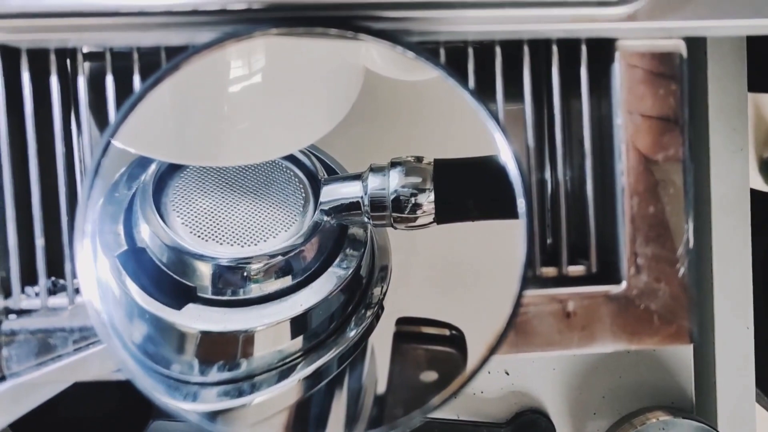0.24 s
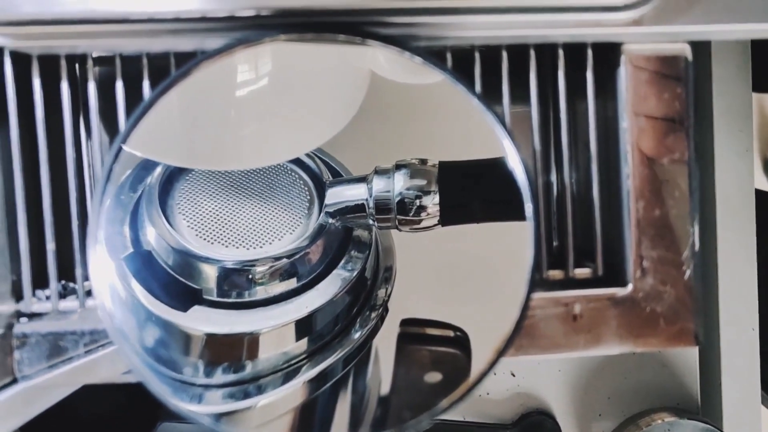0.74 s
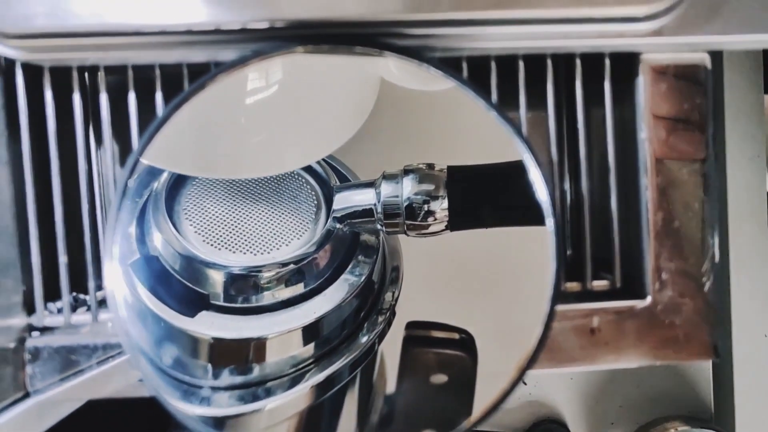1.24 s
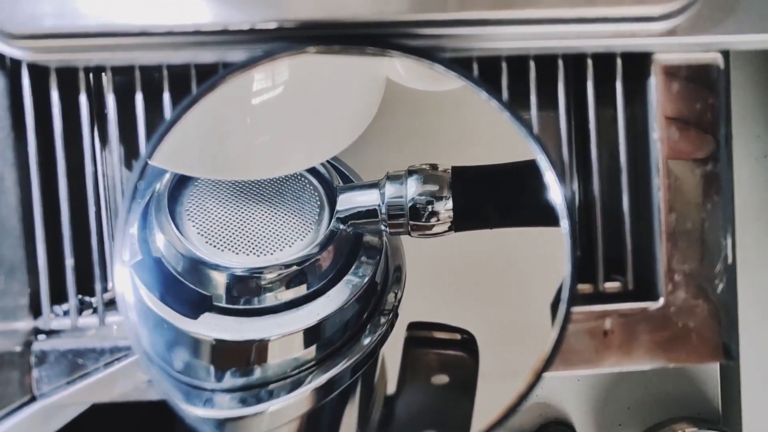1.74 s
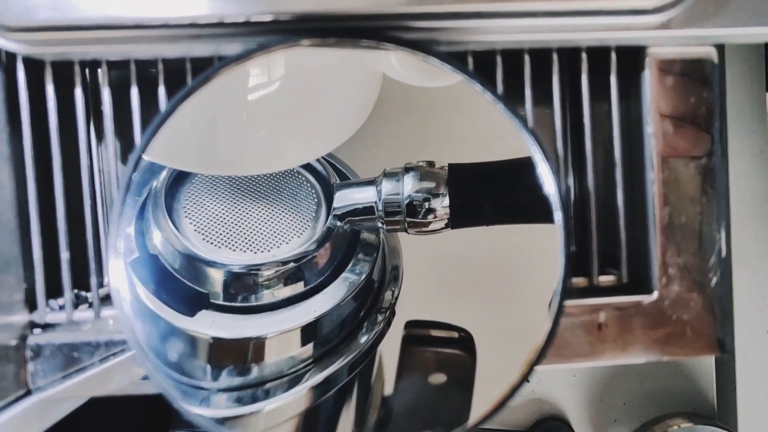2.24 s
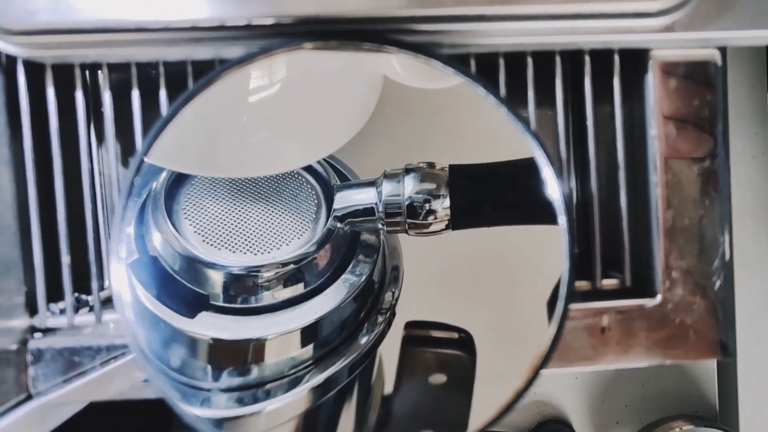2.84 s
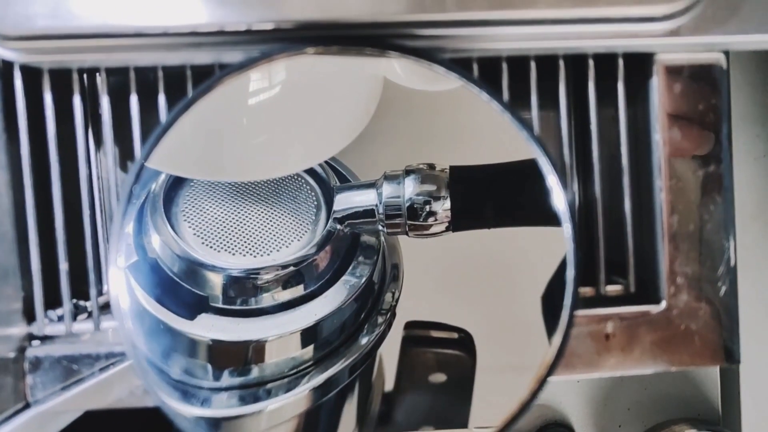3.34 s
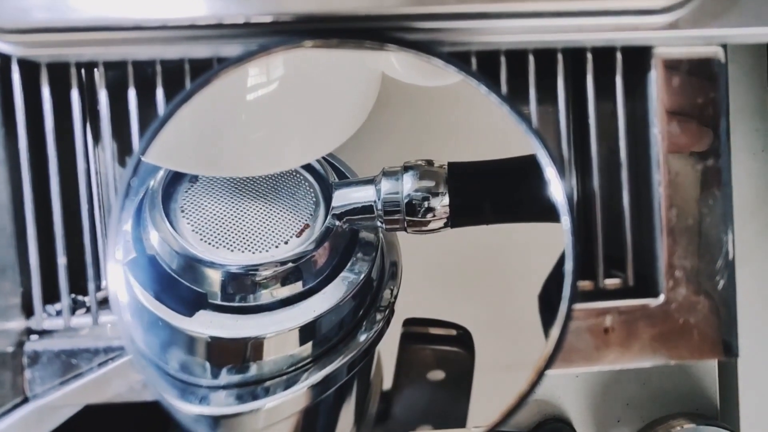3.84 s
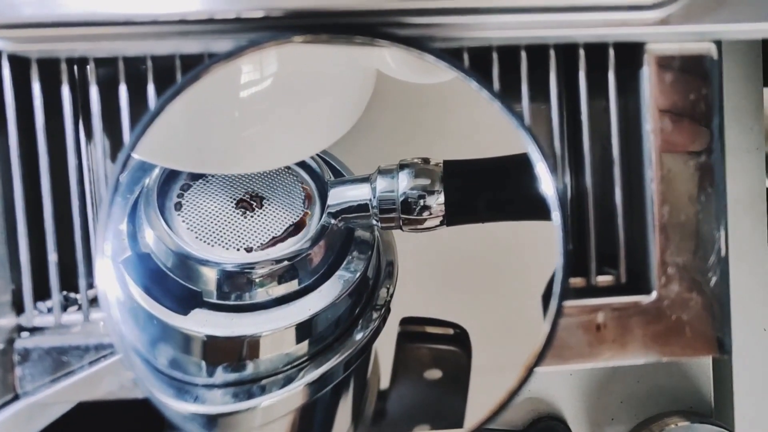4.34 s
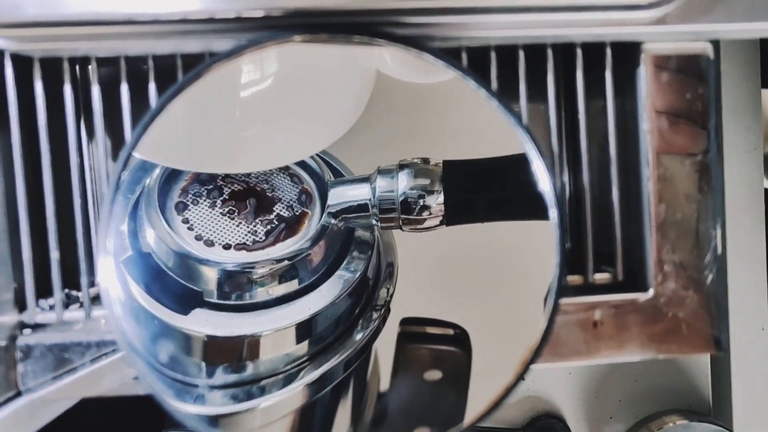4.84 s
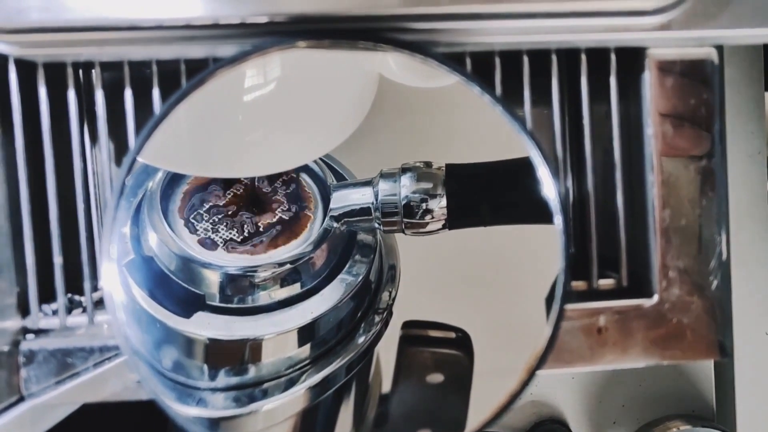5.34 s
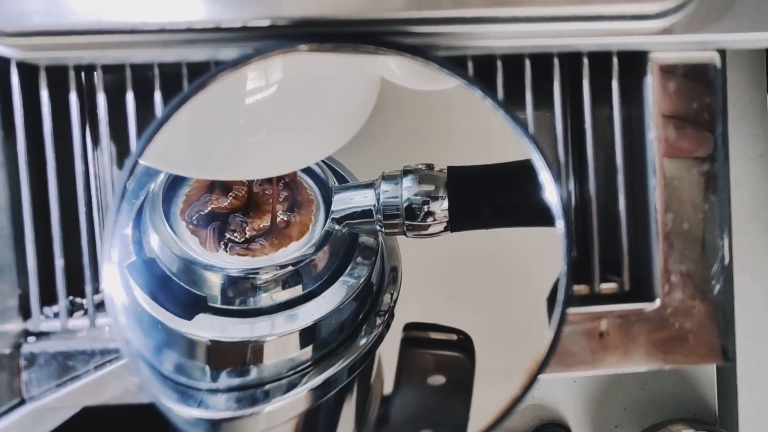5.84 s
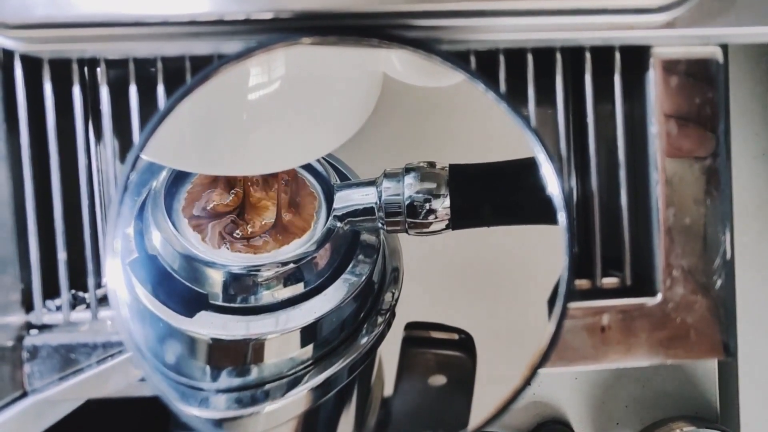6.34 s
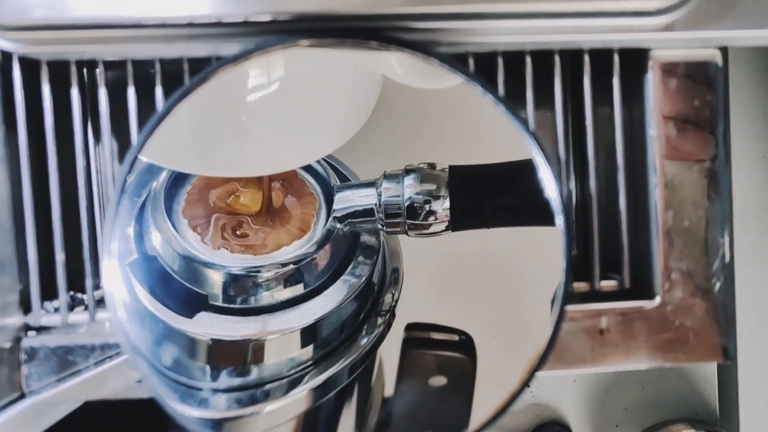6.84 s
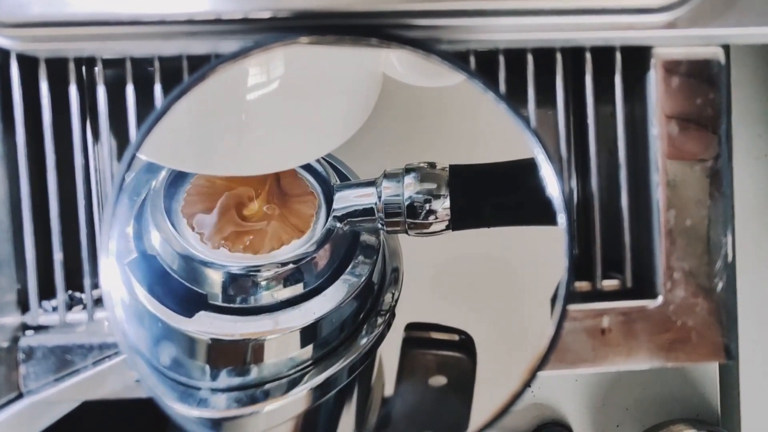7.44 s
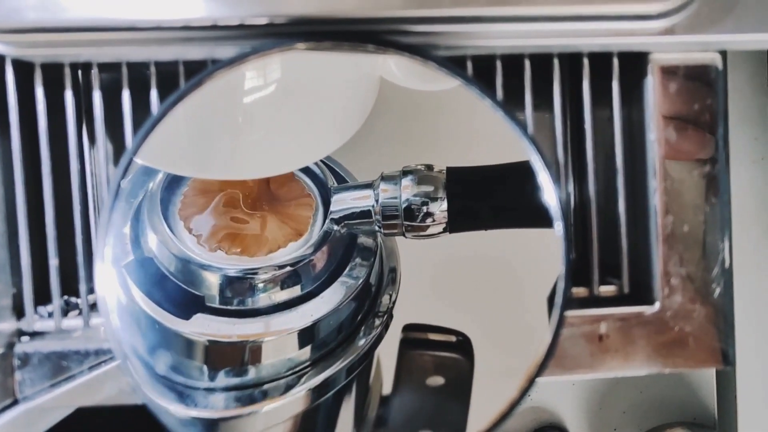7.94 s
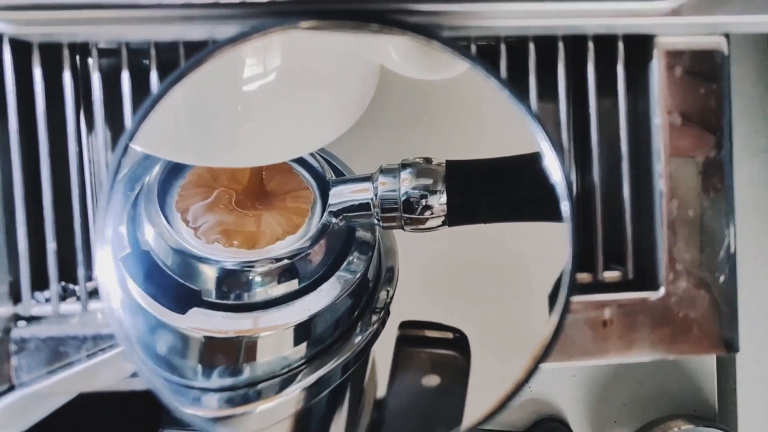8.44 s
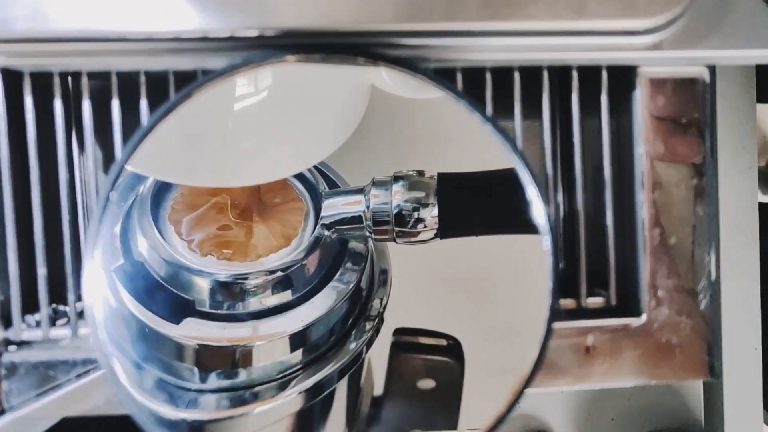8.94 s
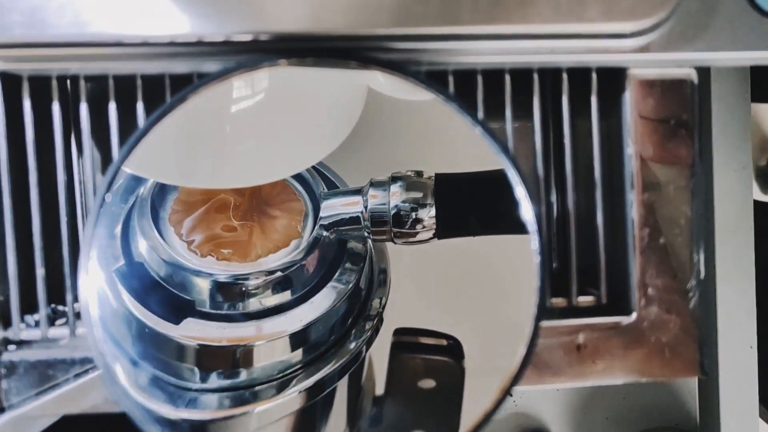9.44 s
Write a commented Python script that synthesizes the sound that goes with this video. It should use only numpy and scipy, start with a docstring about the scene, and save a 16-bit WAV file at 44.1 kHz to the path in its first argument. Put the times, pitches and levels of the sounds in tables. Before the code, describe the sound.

Close stereo sound of an espresso machine in a quiet kitchen. Faint room tone and a fuzzy distant drone come first, then a quick cluster of dull clunks and a small hiss as the pump motor starts. It holds a low mains-like hum with a fast rattling throb and rushing water. Several seconds later, bright coffee drops patter for about a second, ending with one deeper plop under the continuing hum.

```python
"""A quiet kitchen with a faint fuzzy drone; then the motor of a rotary espresso pump switches on and hums.
Mains buzz, shaft tones and their beats are sums of cosines; water and bearings rush as shaped noise with a
rattle that repeats with the rotations. Switch and valve blows ring the frame. Later the first coffee drops
spatter into a cup as bubble notes, ticks and spray. Two close microphone ports hear most tones at different
strengths; some weak tones reach both alike."""
import sys
import numpy as np
from scipy import signal
from scipy.fft import rfft, irfft, next_fast_len
from scipy.io import wavfile

SR = 44100
rng = np.random.default_rng(int(sys.argv[2]) if len(sys.argv) > 2 else 0)


def magnitude_from_level(level_db):
    """Linear magnitude for a level in decibels (20 dB per decade)."""
    exponent = np.asarray(level_db, float) / 20
    return 10 ** exponent


def generate_wav(sig):
    """Save sig (samples, or channels by samples) to the path in sys.argv[1] as 16-bit PCM at SR."""
    pcm = np.round(np.clip(np.atleast_2d(sig).T, -1, 1) * 32767).astype(np.int16)
    wavfile.write(sys.argv[1], SR, pcm)


N = 427329
T = np.arange(N) / SR
SIZE = next_fast_len(N)
HZ = np.fft.rfftfreq(SIZE, 1 / SR)


def read(points, hz):
    """Columns of a spectrum table at the frequencies hz, interpolated over log frequency."""
    f, *columns = np.transpose(points)
    return [np.interp(np.log(hz + 1), np.log(f + 1), c) for c in columns]


def add(mix, s, sound):
    """Mixes a two-channel sound in at time s."""
    part = mix[:, round(s * SR):][:, :sound.shape[1]]
    part += sound[:, :part.shape[1]]


def drift(t, top_hz):
    """Slow random wandering of rms 1: sines of random phase from 0.1 Hz to top_hz."""
    hz = np.geomspace(.1, top_hz, 12)[:, None]
    x = (np.sin(2 * np.pi * (hz * t + rng.random((12, 1)))) / hz ** 0.03).sum(0)
    return x / x.std()


def peak_shape(hz, width_hz):
    """Power response of a resonance on the grid HZ, 1 at its centre."""
    return 1 / (1 + (2 * (HZ - hz) / width_hz) ** 2)


def noise(left_db, right_db, same, source=None):
    """Steady two-channel noise from dB per Hz and left-right likeness on the grid HZ."""
    a, b = rfft(rng.standard_normal((2, N)) if source is None else source, SIZE)
    same = np.clip(same, -1, 1)
    z = np.array([a, same * a + np.sqrt(1 - same ** 2) * b]) * magnitude_from_level([left_db, right_db])
    return irfft(z, SIZE)[:, :N] * np.sqrt(SR / 2)


# Room tone. Each row: frequency in Hz, relative density in dB per Hz.
AIR = [(20, 0), (52, -2), (110, -20), (200, -22), (700, -26), (1400, -33), (5000, -46), (14500, -46)]
# Each row: frequency in Hz, left-right likeness of the room tone (0..1).
AIR_SAME = [(60, 0.37), (300, 0.35), (1200, 0.054), (3000, 0.12)]
AIR_DB = -65.5  # rms of the two-port mean
# Distant appliance. Each row: centre in Hz, width in Hz, approximate level in dB.
DRONE = [(345, 60, -83), (610, 50, -89), (1060, 90, -81)]


def kitchen():
    """Room tone as shaped noise, and a distant appliance's drone as narrow noise bands."""
    air = noise(*read(AIR, HZ) * 2, *read(AIR_SAME, HZ))
    air *= magnitude_from_level(AIR_DB) / air.mean(0).std()
    power_per_hz = sum(magnitude_from_level(db) ** 2 / width * peak_shape(hz, width) ** 2 for hz, width, db in DRONE)
    drone_db = 10 * np.log10(power_per_hz)
    return air + noise(drone_db, drone_db, 0.66)


# Hiss at the switch and as pressure arrives.
# Each row: start in seconds, length in seconds, approximate level in dB, centre in Hz, width in Hz.
SPITS = [(0.823, 0.043, -53, 7000, 9000), (1.11, 0.035, -45, 6900, 1200)]


def spits():
    """Short spits of hiss: resonant noise under a tapered window."""
    out = np.zeros((2, N))
    for s, length_s, db, hz, width in SPITS:
        shape_db = db - 10 * np.log10(width) + 10 * np.log10(peak_shape(hz, width))
        count = round(length_s * SR)
        add(out, s, noise(shape_db, shape_db - 2, 0)[:, :count] * signal.windows.tukey(count, .6))
    return out


SWITCH_S, PRESSURE_S = .83, 0.31  # motor on; time constant of the pressure rise


def since():
    """Seconds since the switch."""
    return np.maximum(T - SWITCH_S, 0)


def start(rise_s, slack_db):
    """Gain of a layer that rises after the switch; its slack offset vanishes as pressure builds."""
    return (1 - np.exp(-since() / rise_s)) ** 2 * magnitude_from_level(slack_db * np.exp(-since() / PRESSURE_S))


FREE_TURNS_PER_S, LOADED_TURNS_PER_S = 24.9, 23.6342  # without and with pressure
CREEP_TURNS_PER_S2 = .0018
SPIN_UP_S, BRAKE_S = .03, .11


def speed():
    """Shaft turns per second: it spins up, the water brakes it, then it creeps faster."""
    slip = (FREE_TURNS_PER_S - LOADED_TURNS_PER_S) * np.exp(-since() / BRAKE_S)
    braked = LOADED_TURNS_PER_S + CREEP_TURNS_PER_S2 * since() + slip
    return braked * (1 - np.exp(-since() / SPIN_UP_S))


BUZZ_HZ = 99.975  # twice the mains frequency
THROB = range(20, 23)  # shaft multiples that peak together once a turn
KNOCK_ANGLE_RAD, KNOCK_HZ = 3.32, (202, 530)  # half a turn later a duller knock aligns this band


def tones(rows, buzz, shaft, waver_db, in_step=False):
    """Sums wavering cosines at whole multiples of the two rotations.
    In step, neighbouring shaft multiples start together and throb once a turn.
    Buzz overtones are locked to the stroke: odd ones sharpen it, even ones skew it."""
    out, slow, last = np.zeros((2, len(buzz))), np.linspace(0, N / SR, 200), None
    for m, n, left_db, right_db, lead in rows:
        chance = 2 * np.pi * rng.random()
        begin = begin if in_step and last == (m, n - 1) else chance
        if n == 0 and in_step:
            stroke = 0 if m == 1 else (np.pi if m % 2 else -np.pi / 2)
            begin = stroke - lead / 2
        if m == 0 and in_step and n in THROB:
            begin = -.55 * abs(n - THROB[1])  # the outer two lag a little
        elif n != 0 and in_step and KNOCK_HZ[0] < m * BUZZ_HZ + n * LOADED_TURNS_PER_S < KNOCK_HZ[1]:
            begin = KNOCK_ANGLE_RAD * n - m + .3 * (chance - np.pi)  # loosely aligned
        if not (m == 0 and n in THROB[1:]):  # the throbbing tones swell together
            waver = np.interp(np.linspace(0, 199, len(buzz)), range(200), magnitude_from_level(waver_db * drift(slow, 3)))
        turn, last = m * buzz + n * shaft + begin, (m, n)
        rms = magnitude_from_level([[left_db], [right_db]])
        out += np.sqrt(2) * rms * waver * np.cos([turn + lead, turn])
    return out


# Other weak tones. Each row: frequency in Hz, base level in dB before the offsets and random spread.
FAINT = [(50, -68), (160, -65), (320, -66), (450, -72), (800, -63.5), (1400, -77.5), (2200, -77),
         (3200, -82)]


def faint_rows():
    """Rows for the other shaft multiples below 110 and some near beats of the buzz, of random strength."""
    typed = {(0, r[0]) for r in SHAFT} | {(r[0], r[1]) for r in [*BEATS, *WEAVE]}
    pairs = [(0, n) for n in range(2, 110)]
    pairs += [(m, n) for m in range(1, 18) for n in (-4, -2, 2, 4, 18)]
    m, n = np.transpose([p for p in pairs if p not in typed and p != (1, -4)])
    hz = m * BUZZ_HZ + n * LOADED_TURNS_PER_S
    spread = rng.uniform(-np.sqrt(3), np.sqrt(3), (len(m), 4)).T
    vane_db = 3 * (n % 4 == 0) * (m == 0)  # four vanes stress every fourth multiple
    apart = np.minimum(hz / 600, 2)  # the ports hear low tones alike
    common_db = read(FAINT, hz)[0] + vane_db - 2.5 * (m > 0) + 2 * spread[0]
    ports_db = common_db + 1.5 * apart * spread[1:3]
    return np.transpose([m, n, *ports_db, apart ** 2 * spread[3]])


# Mains buzz. Each row: multiple of the buzz, left rms in dB, right rms in dB, left lead in rad.
BUZZ = [(1, -24, -25.5, -0.1), (2, -40, -41, -0.1), (3, -48, -52, -0.0), (4, -57, -54, 0.0),
        (5, -43, -49, 0.8), (6, -51, -46, 2.2), (7, -51, -56, 1.0), (8, -51, -70, 0.4), (9, -62, -49, -1.6),
        (10, -66, -45, -1.1), (11, -55, -59, 0.6), (13, -72, -59, 2.4), (15, -55, -61, 1.2)]
# Shaft tones. Each row: multiple of the shaft speed, left rms in dB, right rms in dB, left lead in rad.
SHAFT = [(4,-55,-62,.4),(5,-50,-52,-.1),(6,-44,-44,0),(8,-50,-50,.2),(9,-56,-56,0),(12,-49,-54,-.8),(14,-55,-56,.3),(18,-57,-56,.1),(20,-44,-44,-.4),(21,-48,-46,0),(22,-46,-44,0),(24,-58,-51,2.4),(25,-59,-61,.8),(26,-51,-58,.7),(33,-63,-54,-.8),(34,-75,-55,-2.8),(39,-57,-54,-.4),(45,-60,-55,3.1),(46,-60,-53,1.7)]
# The magnetic pull beats with the turning rotor.
# Each row: buzz multiple, shaft multiple, left rms in dB, right rms in dB, left lead in rad.
BEATS = [(1, 1, -54, -62, -0.5), (3, -4, -56, -55, 0.0), (2, 2, -58, -59, -0.1), (-1, 18, -56, -55, 0.1),
         (1, 11, -57, -55, 0.0), (-1, 20, -57, -56, -0.0), (1, 26, -62, -55, 1.1), (7, 2, -57, -62, 1.9),
         (5, 2, -63, -59, 1.0), (3, 26, -52, -48, 0.9), (14, 2, -61, -80, 0), (15, -2, -59, -74, -0.9)]
# Weak tones alike at both ports; close neighbours weave.
# Each row: buzz multiple, shaft multiple, rms in dB.
WEAVE = [(0, 2, -58), (-1, 10, -57), (1, 2, -60), (-1, 14, -62), (1, 6, -63), (0, 11, -59), (2, 3, -64),
         (3, -1, -60), (1, 8, -61), (-2, 22, -61), (0, 15, -59), (3, 8, -62), (1, 18, -59), (0, 13, -60),
         (4, 4, -59), (0, 132, -73)]
BUZZ_ANGLE_RAD, SHAFT_ANGLE_RAD = -3, -1.262  # where the rotations stand at their zero
BUZZ_RISE_S, TURN_RISE_S = 0.027, 0.042
SLACK_BUZZ_DB, SLACK_OVERTONE_DB, SLACK_SHAFT_DB = -4, -4.5, -7  # offsets before pressure
HIGH_OVERTONE_S = 0.84  # the upper buzz overtones emerge late
START_WINDING_S, START_WINDING_DB = 0.944, -10  # buzz is weaker until the starting switch drops out


def motor(shaft):
    """Buzz, shaft tones and beats, computed at a quarter of the rate since all lie low."""
    t, shaft = T[::4], shaft[::4] + SHAFT_ANGLE_RAD
    buzz = 2 * np.pi * BUZZ_HZ * t + BUZZ_ANGLE_RAD
    rows = [(m, 0, *r) for m, *r in BUZZ]

    starting = magnitude_from_level(START_WINDING_DB * np.clip((START_WINDING_S - t) / 0.042 + 1, 0, 1))
    hum = tones(rows[:1], buzz, shaft, waver_db=0.0, in_step=True) * starting
    hum *= start(BUZZ_RISE_S, SLACK_BUZZ_DB)[::4]

    overtones = tones(rows[1:6], buzz, shaft, waver_db=0.86, in_step=True)
    overtones *= start(BUZZ_RISE_S, SLACK_OVERTONE_DB)[::4]

    high_overtones = tones(rows[6:], buzz, shaft, waver_db=1.8, in_step=True)
    high_overtones *= 1 - np.exp(-(since()[::4] / HIGH_OVERTONE_S) ** 2)

    turning_rows = [(0, *r) for r in SHAFT] + list(BEATS) + [(*r, r[2], 0) for r in WEAVE]
    turning = tones(turning_rows, buzz, shaft, waver_db=0.9, in_step=True)
    turning += tones(faint_rows(), buzz, shaft, waver_db=2.5)
    turning *= start(TURN_RISE_S, SLACK_SHAFT_DB)[::4]
    return signal.resample_poly(hum + overtones + high_overtones + turning, 4, 1, axis=1)[:, :N]


RATTLE_SHARE = .45  # power share of the rush that repeats with both rotations
# Each row: buzz multiple, relative level in dB.
RATTLE = [(-1, -4), (1, 0), (2, 0), (3, -2), (4, -5)]


def rattle(shaft):
    """Random patterns that repeat every turn, each shaken by a buzz multiple, mixed with plain noise."""
    top, out = 300, np.zeros((2, N))  # top: number of shaft multiples, counted from 0
    for m, db in RATTLE:
        lines = np.zeros((2, 4096), complex)
        lines[:, :top] = rng.standard_normal((2, top, 2)) @ [1, 1j]
        place = (shaft / (2 * np.pi) % 1 * 4096).astype(int)
        turn = np.fft.ifft(lines)[:, place]
        out += magnitude_from_level(db) * (turn * np.exp(2j * np.pi * m * BUZZ_HZ * T)).real
    out *= np.sqrt(top * LOADED_TURNS_PER_S / (SR / 2)) / out.std()
    return np.sqrt(RATTLE_SHARE) * out + np.sqrt(1 - RATTLE_SHARE) * rng.standard_normal((2, N))


WHINE_HZ, WHINE_WIDTH_HZ, WHINE_DB_PER_HZ = 2186, 59, -77  # density before fits and port offsets


def whine():
    """A pipe whines fitfully under pressure: narrow noise of wandering level."""
    shape_db = WHINE_DB_PER_HZ + 20 * np.log10(peak_shape(WHINE_HZ, WHINE_WIDTH_HZ))
    fits_db = 1.5 * drift(T[::64], 25).repeat(64)[:N] - 12 * np.exp(-(since() / 1.1) ** 2)
    return noise(shape_db - 1.5, shape_db + 5.5, 0) * magnitude_from_level(fits_db)


# Rumble while the pump fills. Each row: frequency in Hz, density in dB per Hz before the fade.
FILLING = [(60, -78), (130, -59), (300, -59), (520, -63.5), (900, -62), (1600, -100), (4000, -110)]
FILLING_T60_S = 3.05


def filling():
    """Rumble of the filling pump: low noise that fades from the switch on."""
    return noise(*read(FILLING, HZ) * 2, read(RUSH, HZ)[2]) * magnitude_from_level(-60 * since() / FILLING_T60_S)


# Water and bearings, before the housing.
# Each row: frequency in Hz, left density in dB per Hz, right minus left in dB, left-right likeness (-1..1).
RUSH = [(25, -80, 0, .8), (60, -72, 0, .9), (120, -66, -1, .98), (170, -73, 0, .97), (320, -79, 0, .92),
        (430, -82, 1, .8), (700, -79, 3, .4), (1000, -79.5, 2, 0), (1300, -79, -2, -.1), (1800, -85, 2, 0),
        (2600, -88, 1, 0), (4000, -92, -3, 0), (7000, -105, -3, 0)]
# Hiss, unlike at the two ports; before the housing, about 2.5 s after the switch.
# Each row: frequency in Hz, left density in dB per Hz, right minus left in dB.
HISS = [(1500, -100, 10), (2930, -99, 8.5), (4560, -87.5, -6), (5370, -93, 1), (5850, -87, -11),
        (6700, -94.5, -22), (6970, -88, 8), (8000, -91.5, -4), (9000, -91, 0), (10600, -89.5, -2),
        (11420, -93, 0), (11950, -102, -20), (12200, -93, -9), (14200, -96.5, -11)]
# Panels and pipes that the rush excites.
# Each row: centre in Hz, width in Hz, left boost in dB, right boost in dB.
HOUSING = [(49.3, 11, 9, 5.5), (505, 70, 8, 8), (818, 42, 10, 5), (1085, 164, 4, 6.5), (1490, 130, 4.5, 6),
           (2110, 90, -20, 3), (3256, 200, -10, 4)]
FLOW_RISE_S = 0.04
SLACK_RUSH_DB, SLACK_HISS_DB = 1.5, -4.5  # offsets before pressure
HISS_DB_PER_S = 0.28  # the hiss keeps growing slowly


def rush(shaft):
    """Noise through the housing resonances; the hiss pulses with a fixed pattern on every turn."""
    ring = 1 + sum((magnitude_from_level([[l], [r]]) ** 2 - 1) * peak_shape(f, w) for f, w, l, r in HOUSING)
    ring_left_db, ring_right_db = 10 * np.log10(np.maximum(ring, .01))
    left_db, right_less_left_db, same = read(RUSH, HZ)
    low = noise(left_db + ring_left_db, left_db + right_less_left_db + ring_right_db, same, rattle(shaft))
    left_db, right_less_left_db = read(HISS, HZ)
    hiss = noise(left_db + ring_left_db, left_db + right_less_left_db + ring_right_db, 0)

    pulse = 1 + sum(0.069 * np.cos(k * shaft + 2 * np.pi * rng.random()) for k in range(1, 8))
    flutter_db = 0.8 * drift(T[::64], 40).repeat(64)[:N]
    hiss *= pulse * magnitude_from_level(HISS_DB_PER_S * (since() - 2.5) + flutter_db)
    return ((low + whine()) * start(FLOW_RISE_S, SLACK_RUSH_DB) + filling() * start(TURN_RISE_S, 0)
            + hiss * start(FLOW_RISE_S, SLACK_HISS_DB))


# Switch and valve blows.
# Each row: start in seconds, level in dB, favoured mode frequency in Hz, crack relative to that level in dB.
BLOWS = [(.842, -34.5, 514, -12), (.872, -26, 113, -30), (.881, -27.5, 760, -7), (.924, -38, 1400, -20),
         (.933, -33, 500, -8), (.958, -28, 496, -9.5), (1.074, -28, 487, -15)]
# Frame modes. Each row: frequency in Hz, relative level in dB, t60 in seconds.
FRAME = [(112, 0.5, .4), (287, -5, .2), (494, -1, 0.36), (727, 4, 0.15), (1403, 0, 0.19), (2250, 9, 0.067),
         (4670, -8, .05)]
FAVOUR_DB_PER_OCTAVE, FARTHEST_DB = -20, -37  # modes far from the favoured pitch ring less, to a floor
CRACK_T60_S, CRACK_HZ = 0.098, 900


def blows():
    """Each blow cracks as decaying low-passed noise and rings the frame's damped modes."""
    out, t = np.zeros((2, N)), T[:8000]
    for s, db, near_hz, crack_db in BLOWS:
        ring = np.zeros((2, len(t)))
        for f, mode_db, t60_s in FRAME:
            favour_db = max(FAVOUR_DB_PER_OCTAVE * abs(np.log2(f / near_hz)), FARTHEST_DB)
            phase = [[0], [rng.normal(0, 0.53) * f / 1000]]
            envelope = magnitude_from_level(mode_db + favour_db - 60 * t / t60_s) * np.minimum(t * f / 1.8, 1)
            ring += envelope * np.sin(2 * np.pi * f * t + phase)
        crack = signal.lfilter(*signal.butter(1, CRACK_HZ, fs=SR), rng.standard_normal((2, len(t))))
        crack *= magnitude_from_level(crack_db - 60 * t / CRACK_T60_S) / crack.std()
        add(out, s, magnitude_from_level(db) * (ring + crack) * np.minimum(t / 0.0015, 1))
    return out


RING_CYCLES = 38.4  # t60 of a bubble in its own cycles: small ones ring higher and shorter


def drop(hz, pan_db, splash_db):
    """A short rising bubble note on a sharp noisy tick, reaching each port differently."""
    t, t60_s = T[:1500], RING_CYCLES / hz
    note = np.sin(2 * np.pi * hz * t * (1 + 5 * t) + [[0], [rng.uniform(-1.3, 1.3)]])
    band = signal.butter(2, [0.6 * hz, min(1.55 * hz, 14300)], "bandpass", fs=SR)
    tick = signal.lfilter(*band, rng.standard_normal((2, len(t))))
    tick *= magnitude_from_level(splash_db - 60 * t / 0.015 - [[0], [6]]) / tick.std()  # the right port faces away
    attack = np.sin(np.pi / 2 * np.minimum(t * hz / 4, 1)) ** 2
    return (note * magnitude_from_level(-60 * t / t60_s) + tick) * attack * magnitude_from_level([[pan_db / 2], [-pan_db / 2]])


# Notes and bright ticks of the coffee drops; a drop may have two rows.
# Each row: start in seconds, level in dB, pitch in Hz.
DROPS = [(6.1394, -47, 4500), (6.1415, -36, 11100), (6.1744, -33.5, 3040), (6.2407, -41, 4700),
         (6.2915, -33, 4460), (6.316, -30.5, 3120), (6.3878, -39, 4400), (6.4186, -25, 6900),
         (6.419, -30, 10600), (6.446, -33, 6000), (6.485, -26, 4800), (6.514, -34, 4800),
         (6.591, -33.5, 2760), (6.665, -30.5, 3000), (6.6814, -37, 3280), (6.715, -24, 3120),
         (6.716, -30, 6800), (6.9061, -41, 4920), (6.9581, -33, 2300), (6.9995, -35, 4560),
         (7.163, -40, 4900), (7.2135, -29, 6200), (7.2389, -31, 4700), (7.2525, -37, 4800),
         (7.2575, -35, 4400), (7.28, -36, 5500), (7.3337, -36, 2540), (7.366, -23.5, 3240),
         (7.366, -31, 9500), (7.4123, -27, 3160), (7.4123, -33, 6000), (7.441, -33, 3120),
         (7.7847, -33, 2400), (8.232, -22.5, 1310)]
CUP_HZ = 3120  # higher notes lean further left; deeper drops fall into coffee and hardly splash
PAN_DB, PAN_DB_PER_OCTAVE, SPLASH_DB, DEEP_DB_PER_OCTAVE = 8.5, 3, -5.5, 8
SPRAY_DB = -52  # smallest droplets
SPRAY_PER_S, SPRAY_S = 900, .032  # peak rate around a row of SPRAY_REF_DB; half-width at 1/e
SPRAY_REF_DB, SPRAY_FOLLOWS_DB_PER_DB = -28, 0.19  # louder rows throw more spray


def coffee():
    """Drop notes and ticks, fine random spray around them, the short ring of cup and tray as a noise tail."""
    out, per_s = np.zeros((2, N)), np.zeros(N)
    for s, db, hz in DROPS:
        octave = np.log2(hz / CUP_HZ)
        deep_db = DEEP_DB_PER_OCTAVE * min(octave, 0)
        pan_db = PAN_DB + PAN_DB_PER_OCTAVE * max(octave, 0)
        add(out, s, magnitude_from_level(db) * drop(hz, pan_db, SPLASH_DB + deep_db))
        spray_db = deep_db + SPRAY_FOLLOWS_DB_PER_DB * (db - SPRAY_REF_DB)
        per_s += SPRAY_PER_S * magnitude_from_level(spray_db) * np.exp(-((T - s) / SPRAY_S) ** 2)

    few_large_db = 4 * np.minimum(rng.exponential(1, N), 3)
    size = magnitude_from_level(SPRAY_DB + few_large_db) * (rng.random(N) < per_s / SR)
    kind = rng.integers(0, 16, N)
    for k, hz in enumerate(np.geomspace(2800, 13500, 16)):
        out += signal.oaconvolve((size * (kind == k))[None], drop(hz, 2, -4), axes=1)[:, :N]

    tail = rng.standard_normal((2, 4000)) * magnitude_from_level(-35 - 60 * T[:4000] / .08)
    return out + signal.oaconvolve(out, tail, axes=1)[:, :N]


def scene():
    """Room, pump and drops."""
    shaft = 2 * np.pi * np.cumsum(speed()) / SR
    return kitchen() + spits() + motor(shaft) + rush(shaft) + blows() + coffee()


def band_limit(x):
    """A steep low-pass at the top of the band."""
    return signal.sosfilt(signal.butter(12, 15590, fs=SR, output="sos"), x)


def record(dry):
    """The right port is nearly deaf around a notch; both ports end at a steep band limit."""
    notch_hz, notch_width_hz, notch_db, edge_hz = 7230, 1000, -28, 14350
    right_db = notch_db * np.exp(-(2 * (HZ - notch_hz) / notch_width_hz) ** 2)
    ports = magnitude_from_level([0 * HZ, right_db]) / (1 + (HZ / edge_hz) ** 200)
    mix = irfft(rfft(dry, SIZE) * ports, SIZE)[:, :N]
    return band_limit(mix)


dry = scene()
out = record(dry)
generate_wav(out)
```